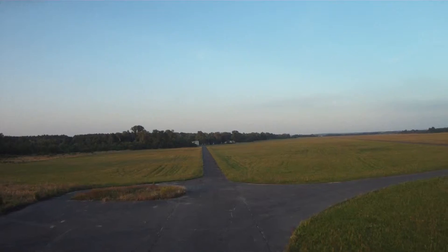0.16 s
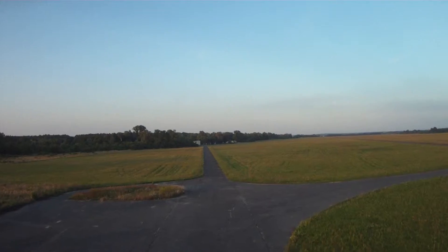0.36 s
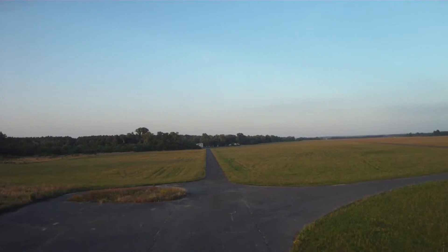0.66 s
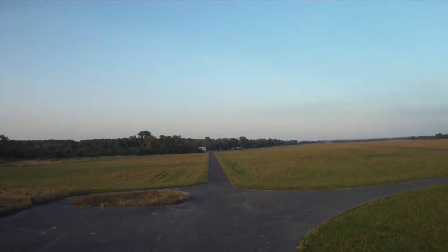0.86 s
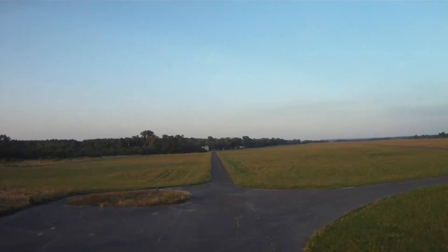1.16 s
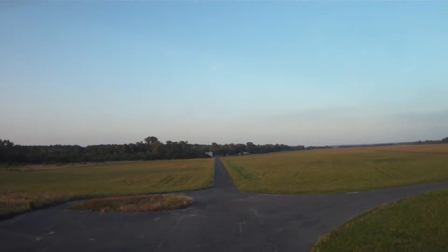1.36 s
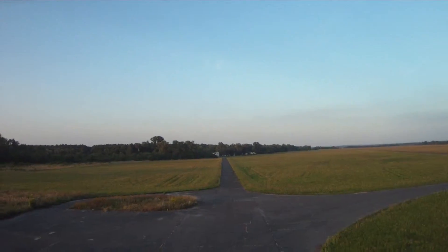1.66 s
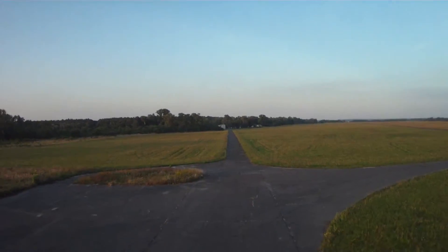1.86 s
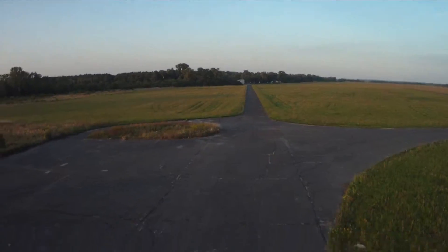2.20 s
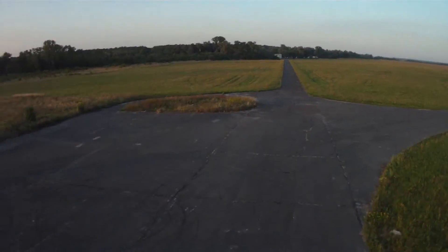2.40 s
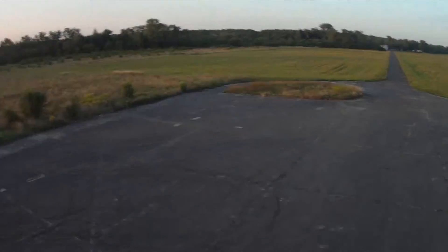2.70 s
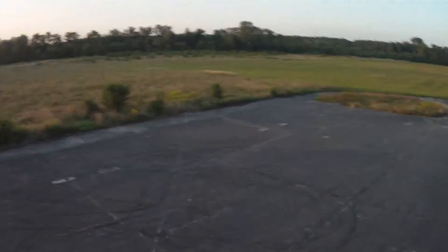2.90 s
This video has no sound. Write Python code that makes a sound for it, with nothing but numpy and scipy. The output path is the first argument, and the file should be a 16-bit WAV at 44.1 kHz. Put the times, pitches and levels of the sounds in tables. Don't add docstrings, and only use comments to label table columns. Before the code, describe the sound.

Steady hissy buzz of a small drone's propellers in flight, tones shifting apart as it yaws.

```python
import sys
import numpy as np
from scipy import signal
from scipy.fft import rfft, irfft
from scipy.io import wavfile

SR = 44100
rng = np.random.default_rng(int(sys.argv[2]) if len(sys.argv) > 2 else 0)


def ratio(d):
    e = np.asarray(d, float) / 20
    return 10 ** e


def pcm_store(signal):
    levels = np.round(np.clip(np.atleast_2d(signal), -1, 1) * 32767)
    wavfile.write(sys.argv[1], SR, levels.astype(np.int16).T)


N = 134505
T = np.arange(N) / SR

# [t/s, shaft f/Hz, blade thump level/dB, frame shake level/dB]
NEAR = [(0.0, 147.7, -24.9, -17.9), (0.09, 147.4, -24.9, -17.9), (0.17, 148.7, -24.8, -16.7),
        (0.26, 147.3, -24.7, -16.5), (0.37, 147.9, -23.9, -18.8), (0.57, 147.1, -23.6, -21.2),
        (0.7, 147.1, -23.3, -18.3), (0.79, 147.7, -24.6, -18.2), (1.02, 147.4, -23.8, -21.7),
        (1.1, 146.9, -24.3, -21.8), (1.21, 148.5, -23.0, -20.2), (1.3, 146.9, -23.6, -18.8),
        (1.43, 147.5, -24.2, -21.0), (1.51, 146.5, -24.6, -18.8), (1.61, 148.1, -24.8, -16.9),
        (1.67, 147.4, -25.4, -14.8), (1.74, 147.4, -25.9, -15.4), (1.82, 146.1, -25.8, -17.2),
        (1.92, 147.0, -24.9, -15.3), (2.01, 145.8, -25.6, -13.2), (2.07, 146.5, -26.4, -14.3),
        (2.13, 146.4, -26.7, -13.5), (2.22, 148.6, -28.2, -14.0), (2.26, 147.9, -28.1, -17.0),
        (2.33, 145.5, -27.0, -36.0), (2.4, 145.2, -28.1, -13.0), (2.43, 144.3, -29.0, -12.0),
        (2.53, 140.4, -25.7, -17.0), (2.66, 134.5, -28.2, -18.3), (2.72, 132.6, -26.5, -21.9),
        (2.83, 131.6, -30.3, -23.2), (2.9, 129.4, -31.8, -27.5), (2.95, 129.7, -31.9, -25.4),
        (3.04, 131.2, -33.5, -22.3)]
SECOND = [(0.0, 140.1, -28.1, -25.0), (0.16, 140.0, -28.1, -25.0), (0.27, 138.8, -29.7, -28.7),
          (0.4, 139.7, -30.9, -25.9), (0.47, 139.2, -29.9, -26.2), (0.58, 139.8, -30.1, -24.4),
          (0.78, 138.5, -31.2, -32.2), (0.9, 139.2, -29.7, -25.5), (1.04, 138.5, -31.2, -31.9),
          (1.41, 139.4, -32.4, -28.4), (1.52, 138.0, -34.6, -30.7), (1.61, 138.7, -33.9, -26.5),
          (1.73, 138.7, -35.8, -34.8), (1.82, 136.8, -36.4, -34.8), (1.94, 138.4, -32.8, -30.5),
          (2.11, 135.6, -36.2, -34.3), (2.23, 136.7, -40.6, -32.2), (2.3, 136.1, -36.1, -36.0),
          (2.45, 141.3, -30.9, -29.0), (2.56, 143.0, -29.7, -23.0), (2.65, 147.0, -36.7, -17.5),
          (2.76, 149.2, -37.0, -13.0), (2.87, 150.4, -36.3, -10.5), (2.96, 149.0, -37.2, -15.5),
          (3.04, 143.1, -36.9, -27.0)]
THIRD = [(0, 126.5, -46, -50), (.8, 124.3, -35, -44), (1.6, 122, -35, -44), (2.1, 119.4, -46, -49),
         (2.25, 113.6, -51, -32), (2.36, 118, -49, -30.5), (2.5, 125, -37.5, -35), (2.58, 134.5, -27, -17),
         (2.63, 140, -52, -11.5), (2.75, 139, -35, -27), (2.9, 137.8, -40, -27), (3.05, 137.7, -34, -37)]
# [t/s, wash level/dB, blade load level/dB, tip hiss level/dB]
AIR = [
    (0, -54, -22.5, -31),
    (.4, -47, -21.5, -31),
    (1.55, -50.5, -21, -31.5),
    (1.75, -51.5, -22.5, -33.5),
    (2.1, -50.5, -21.5, -33),
    (2.25, -51, -19.5, -31),
    (2.41, -58.5, -19.5, -31.5),
    (2.49, -58, -22, -33),
    (2.75, -61, -24, -34),
    (3.05, -58, -22.5, -34.5),
]


def evened(x):
    return x / np.sqrt(np.mean(x ** 2) + 1e-20)


def slow(rate_hz):
    sos = signal.butter(2, [rate_hz / 10, rate_hz], "band", fs=SR, output="sos")
    noise = rng.standard_normal(N + SR)
    return evened(signal.sosfilt(sos, noise)[SR:])


def curve(table, order):
    rows = np.array(table, float)
    return np.interp(T, rows[:, 0], rows[:, order])


def turns(hz):
    return 2 * np.pi * np.cumsum(hz) / SR


def colour(x, points):
    hz = np.fft.rfftfreq(N, 1 / SR) + 1
    f, db = np.transpose(points)
    octaves_out = np.log2(np.maximum(hz / f[-1], 1) * np.maximum(f[0] / hz, 1))
    gain_db = np.interp(np.log(hz), np.log(f), db) - 60 * octaves_out
    return evened(irfft(rfft(x) * ratio(gain_db), N))


def chopped(depth, gusts_db):
    near, second = turns(curve(NEAR, order=1)), turns(curve(SECOND, order=1))
    chop = np.cos(2 * near) + 0.48 * np.cos(2 * second) + 0.083 * np.cos(near)
    return np.exp(depth * chop) * ratio(gusts_db * slow(37)) * rng.standard_normal(N)


def electrics():
    # [f/Hz, level/dB, waver/Hz]
    whistles = [(7604, -48, 4), (7643, -56, 4), (7328, -61, 8), (15210, -60, 8), (14930, -62, 10)]
    # [t/s, f/Hz, level/dB]
    winding = [
        (2.6, 14470, -62),
        (2.68, 14490, -50),
        (2.75, 14650, -45),
        (2.82, 14745, -45),
        (2.857, 14670, -46),
        (2.91, 14770, -45),
        (2.94, 14620, -48),
        (2.97, 14350, -65),
    ]
    steady = 0
    for f, db, waver_hz in whistles:
        steady = steady + ratio(db + 0.64 * slow(23)) * np.cos(turns(f + waver_hz * slow(3)))
    on = (T > winding[0][0]) & (T < winding[-1][0])
    hz = curve(winding, order=1) + 6 * slow(30)
    whine = on * ratio(curve(winding, order=2) + slow(20)) * np.cos(turns(hz))
    return np.sqrt(2) * (steady + whine)


def panels():
    # [f/Hz, width/Hz, level/dB]
    panel_modes = [(559, 27, -33.5), (611, 29, -33), (686, 13, -35.5), (1208, 46, -41), (1494, 157, -34),
                   (1812, 33, -37), (2122, 30, -31.5), (4050, 470, -42), (5900, 74, -56),
                   (7210, 1000, -48.5)]
    hz = np.fft.rfftfreq(N, 1 / SR)
    hiss = rfft(chopped(depth=0.29, gusts_db=1.7))
    ringing = 0
    for f, width_hz, db in panel_modes:
        ring = np.fft.ifft(hiss / (1 + (2 * (hz - f) / width_hz) ** 2), N)
        flex = np.exp(1j * turns(0.012 * f * slow(5)))
        ringing = ringing + ratio(db) * evened((ring * flex).real)
    load = ratio(curve(AIR, order=2))
    return (load / load.mean()) ** 0.87 * ringing


def airflow():
    # [f/Hz, level/dB per Hz]
    wash_colour = [(25, -33), (49, -19.5), (102, -9.5), (167, -5.5), (240, -3)]
    frame_colour = [(230, -25.5), (270, -27), (340, -20.5), (510, -15), (570, -8), (620, -8.5),
                    (770, -19.5), (990, -26)]
    case_colour = [(1000, -18.5), (1170, -11), (1300, -13.5), (1600, -6.5), (1780, 0.5), (2130, 3.5),
                   (2420, -3.5), (2800, -27)]
    port_colour = [(2900, -12.5), (3350, -7.5), (3550, -11), (4280, -2), (4870, -11.5), (6150, -11.5),
                   (6550, -24), (8500, -34.5)]
    fizz_colour = [(9300, -15), (10000, -10.5), (10550, -3), (11050, -10), (11800, -5.5), (12400, -9.5),
                   (13500, 1.5), (15300, 2)]
    frame_db, case_db, port_db, fizz_db, wash_db = -3, -1.5, -0.5, -7.5, 11

    frame = ratio(frame_db) * colour(chopped(depth=0.071, gusts_db=-0.2), frame_colour)
    case = ratio(case_db) * colour(chopped(depth=0.25, gusts_db=1.0), case_colour)
    port = ratio(port_db) * colour(chopped(depth=0.31, gusts_db=0.5), port_colour)
    fizz = ratio(fizz_db) * colour(chopped(depth=0.25, gusts_db=-0.6), fizz_colour)
    wash = ratio(wash_db + 2.1 * slow(5.9)) * colour(rng.standard_normal(N), wash_colour)

    tip_db = curve(AIR, order=3) + 0.32 * slow(3.6)
    fizz_tip_db = tip_db.mean() + 0.85 * (tip_db - tip_db.mean())
    turbulence = ratio(curve(AIR, order=2)) * (frame + case) + ratio(tip_db) * port + ratio(fizz_tip_db) * fizz
    eddies = ratio(0.59 * slow(55))
    return ratio(curve(AIR, order=1)) * wash + eddies * turbulence


def arms_db(hz):
    # [f/Hz, width/Hz, level/dB]
    arm_modes = [(670, 30, -10), (815, 18, 11), (850, 12, -9), (1030, 16, -10), (1055, 12, 8),
                 (1085, 12, 10), (1115, 14, -12), (1155, 16, 11), (3600, 300, -14)]
    grid_hz = np.linspace(hz.min(), hz.max(), 200)
    lift_db = sum(db * np.exp(-((grid_hz - f) / width_hz) ** 2) for f, width_hz, db in arm_modes)
    return np.interp(hz, grid_hz, lift_db)


def rotor(table, orders, shiver_hz=0.3):
    hz = curve(table, order=1)
    shaft = turns(hz + shiver_hz * slow(22))
    blade_db, shake_db = curve(table, order=2), curve(table, order=-1)
    hum = 0
    for multiple, db, share in orders:
        k = round(multiple)
        level_db = db + blade_db + share * (shake_db - blade_db) + arms_db(k * hz)
        flutter_db = min(0.4 * multiple, 2.6) * slow(26)
        line = np.cos(k * shaft + 2 * np.pi * rng.random())
        hum = hum + np.sqrt(2) * ratio(level_db + flutter_db) * line
    return hum


def far_rotor():
    # [t/s, shaft f/Hz, level/dB]
    far_shaft = [(0.0, 105.9, -42.1), (0.1, 106.5, -42.1), (0.19, 105.7, -45.5), (0.27, 106.3, -41.0),
                 (0.38, 104.9, -44.1), (0.47, 105.3, -41.9), (0.56, 104.6, -44.8), (0.71, 105.6, -43.0),
                 (0.82, 104.5, -45.7), (0.92, 104.3, -45.1), (1.03, 104.4, -45.1), (1.12, 105.7, -42.1),
                 (1.25, 103.7, -46.1), (1.33, 105.3, -45.3), (1.42, 104.0, -45.1), (1.54, 105.6, -46.4),
                 (1.59, 104.5, -46.9), (1.67, 104.6, -47.4), (1.73, 103.8, -48.1), (1.83, 104.8, -46.7),
                 (1.93, 103.9, -49.6), (2.03, 105.2, -46.4), (2.18, 105.4, -51.2), (2.32, 106.9, -55.1),
                 (2.45, 107.0, -65.0)]
    # [multiple, level/dB, share following frame shake/0-1]
    far_orders = [(1, -5, 0), (2, -8.5, 0), (14, -0.5, 0), (20, -4, 0), (28, -1, 0), (42, 4.5, 0)]
    return rotor(far_shaft, far_orders, shiver_hz=0.2)


def third_rotor():
    # [multiple, level/dB, share following frame shake/-1 to 1, negative opposes it]
    third_orders = [(1, -12.5, -0.19), (2, -5, 0.57), (4, -1, 0.94), (5, 6, -0.065)]
    return rotor(THIRD, third_orders)


def sum_tone():
    hz = 4 * curve(SECOND, order=1) + curve(THIRD, order=1) + 2.8 * slow(36)
    level_db = -17 + 0.52 * curve(SECOND, order=3) + 2.5 * slow(45)
    return ratio(level_db) * np.cos(turns(hz))


def second_rotor():
    # [multiple, level/dB, share following frame shake/0-1]
    second_orders = [(1, -21.5, 0.27), (2, 0.5, 0.067), (3, -22.5, 0.88), (4, -2, 1), (5, 3.5, 0.073),
                     (6, -22.5, 0.56), (13, -12, 0), (14, -5.5, 0.1), (15, -8.5, 0.52), (17, -11, 0),
                     (21, -31.5, 0), (28, -21, 0)]
    return rotor(SECOND, second_orders)


def near_rotor():
    # [multiple, level/dB, share following frame shake/-1 to 1, negative opposes it]
    near_orders = [(1, -28, 0), (2, 0, 0.01), (3, -13.5, 0.13), (4.04, 0.5, 0.97), (5.04, -3, -.3),
                   (6, -15, -0.1), (7, -37, 0), (8, -18.5, 0), (10, -20, 0.6), (12, -15, 0), (14, -30, 0),
                   (16, -17.5, 0.16), (28, -22, 0.2)]
    return rotor(NEAR, near_orders)


def scene():
    hum = far_rotor() + third_rotor() + sum_tone() + second_rotor() + near_rotor()
    return (electrics() + panels() + airflow() + hum)[None]


def low_pass(x):
    return signal.sosfilt(signal.butter(12, 16090, fs=SR, output="sos"), x)


def record(dry):
    # [f/Hz, width/Hz, depth/0-1]
    hollows = [(991, 63, 0.78), (2860, 73, 0.1), (784, 22, 0.3), (659, 21, 0.23)]
    notch_low_hz, notch_high_hz, edge_hz = 8700, 9110, 15330
    hz = np.fft.rfftfreq(N, 1 / SR)
    outside_hz = np.maximum(notch_low_hz - hz, hz - notch_high_hz)
    gain = np.clip(outside_hz / 250, 0, 1) * (hz < edge_hz)
    for f, width_hz, depth in hollows:
        gain = gain * (1 - np.clip(depth, 0, 1) / (1 + ((hz - f) / width_hz) ** 2))
    return low_pass(irfft(rfft(dry) * gain, N))


dry = scene()
out = record(dry)
pcm_store(out)
```